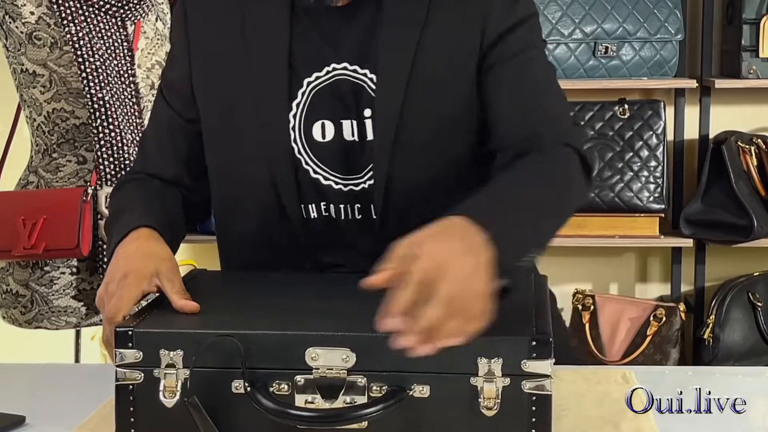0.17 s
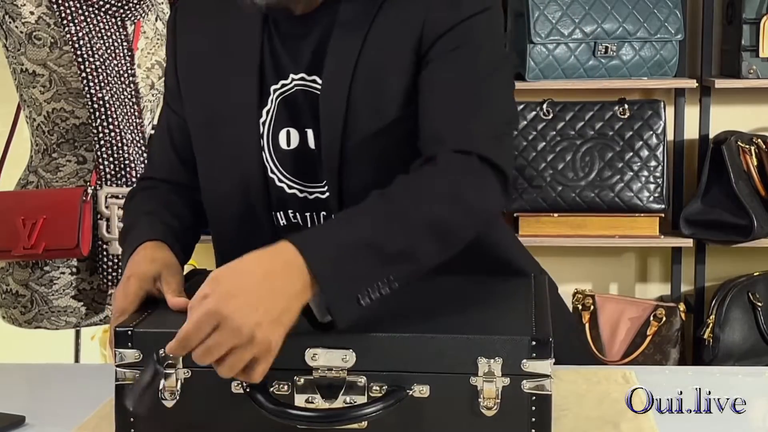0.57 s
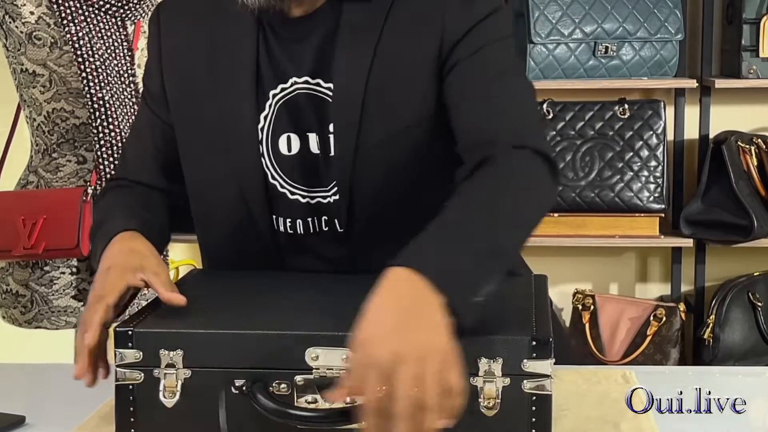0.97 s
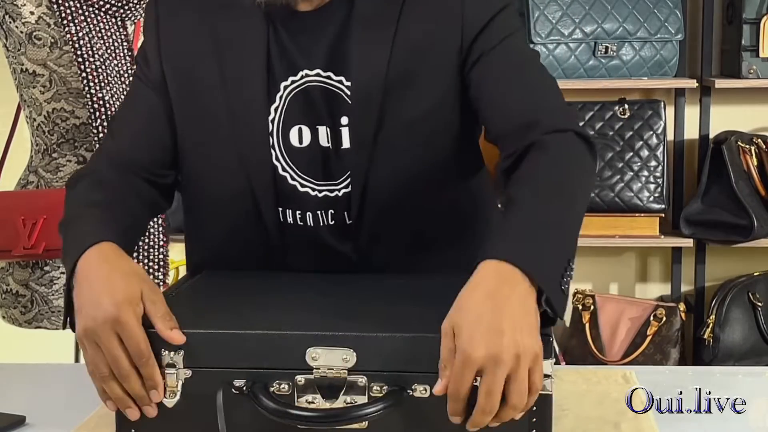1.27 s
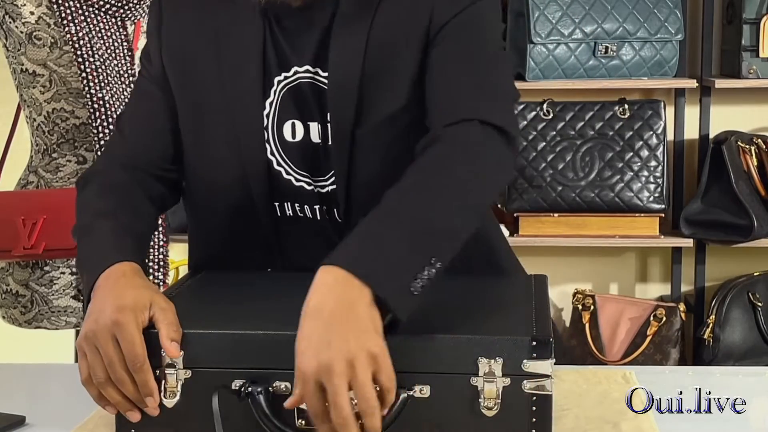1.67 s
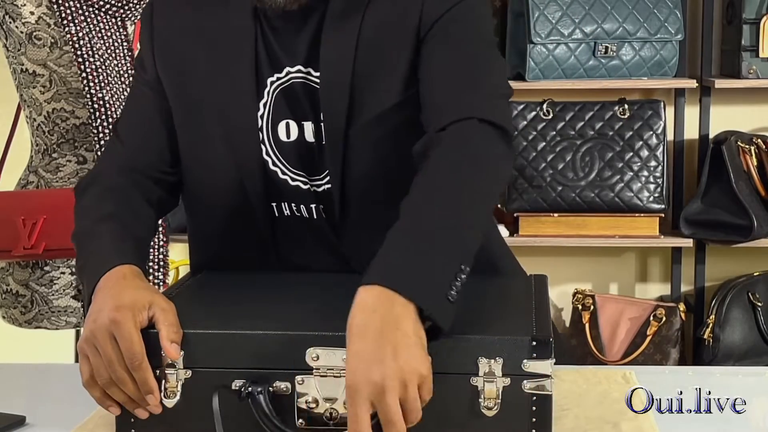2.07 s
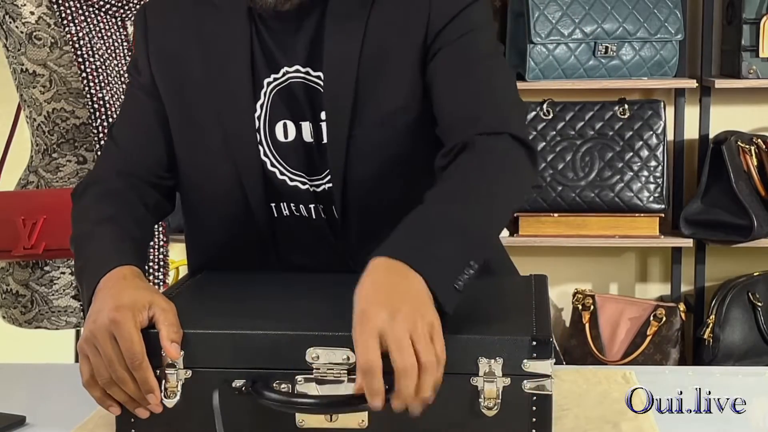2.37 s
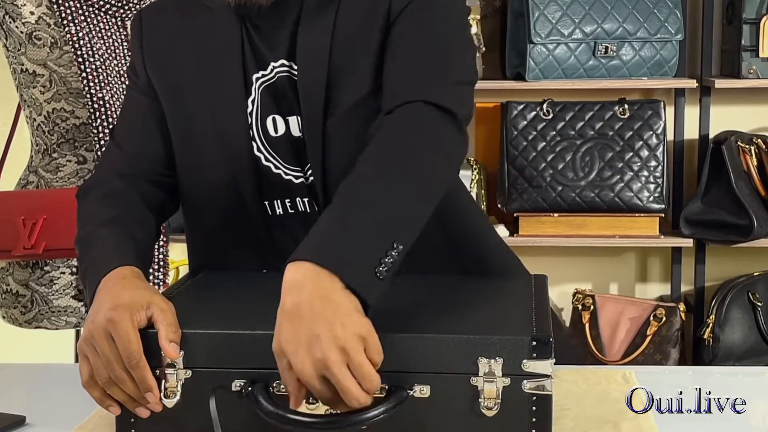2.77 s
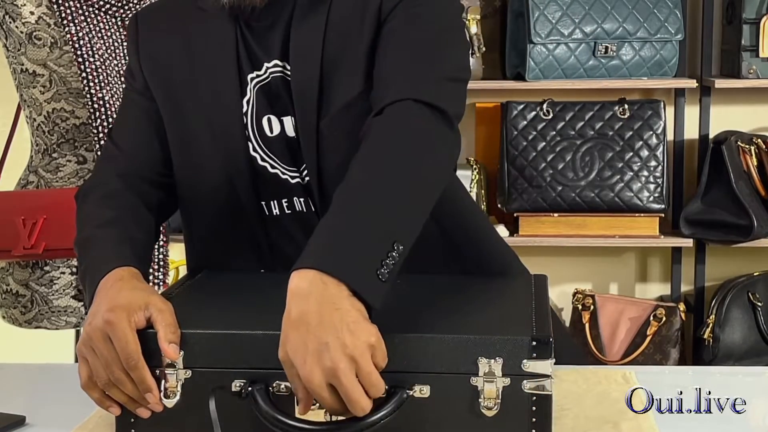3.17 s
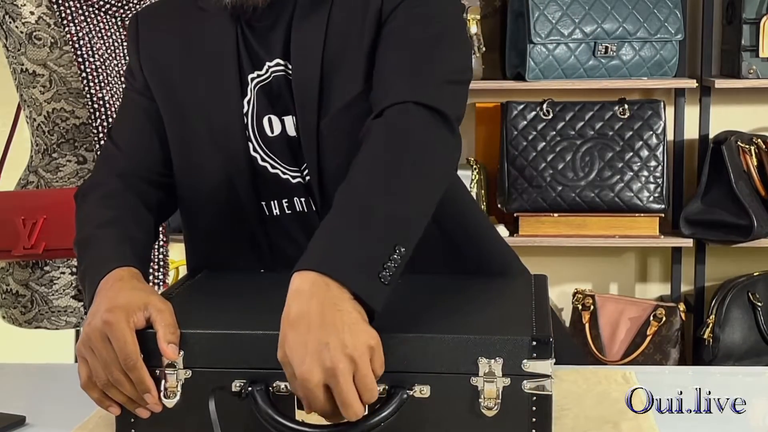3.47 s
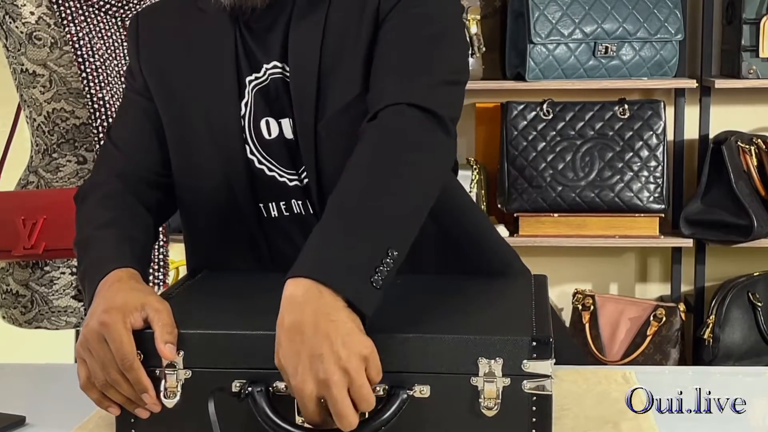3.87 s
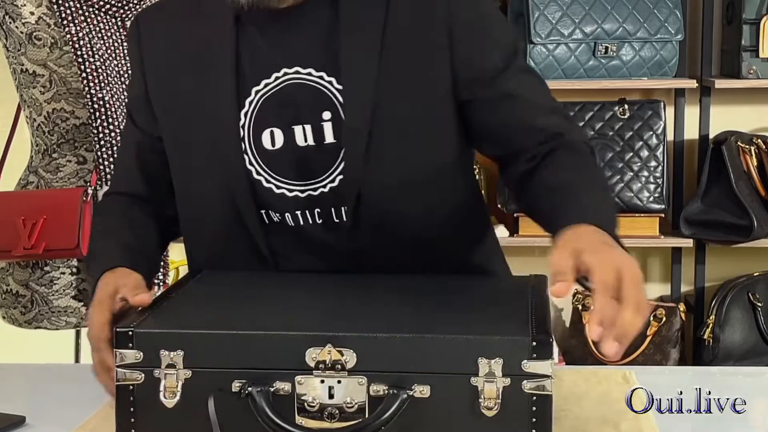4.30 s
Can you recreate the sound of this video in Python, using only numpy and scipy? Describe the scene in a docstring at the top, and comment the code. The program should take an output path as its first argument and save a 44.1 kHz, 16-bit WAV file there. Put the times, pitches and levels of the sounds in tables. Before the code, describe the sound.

A leather briefcase is unlatched near one microphone, with a short echo from the walls of a small room. First a side catch rattles open, then come soft finger bumps, tiny handle squeaks and muffled clicks inside the lock. The hasp flies open in a sharp, bouncing snap that knocks the hollow case, the loudest moment. Light taps and bumps close it out, with sleeves rustling faintly throughout.

```python
"""Briefcase latches in a small room

One microphone close to a leather briefcase on a table, with the walls answering and quiet air behind.
A side catch flips open, the handle squeaks on its pivots and the lock's works click under a hand.
Then the main hasp springs open and bounces, ringing its plate and steel and knocking the hollow case.
In between, sleeves rustle, nails graze the fittings and fingers bump the leather."""
import sys
import numpy as np
from scipy import signal
from scipy.fft import rfft, irfft, next_fast_len
from scipy.io import wavfile
from scipy.ndimage import uniform_filter1d

SR = 44100
rng = np.random.default_rng(int(sys.argv[2]) if len(sys.argv) > 2 else 0)


def unload_audio(sound):
    """Save the sound as a 16-bit wav file, at the path given as the first command line argument."""
    columns = np.transpose(np.atleast_2d(sound))
    # keep every value between -1 and 1, then stretch to whole-number steps
    steps = np.round(np.clip(columns, -1, 1) * 32767)
    wavfile.write(sys.argv[1], SR, steps.astype(np.int16))


N = 195627
T = np.arange(SR // 2) / SR  # the life of one sound [s]

# the room's quiet air (frequency [Hz], level [dB])
AIR_SPECTRUM = [(15, -51.5), (25, -13), (111, 4.5), (591, 1), (641, -2), (1160, -10), (1330, -10.5),
                (3820, -22.5), (6740, -28), (14400, -32), (16000, -57)]
# how long the room rings (frequency [Hz], t60 [s])
ROOM_DECAY = [(80, .45), (210, .45), (330, .29), (520, .28), (700, .3), (2500, .29), (7000, .27),
              (11000, .25), (16000, .2)]
# strength of the room's answer (frequency [Hz], level [dB])
WALL_TONE = [(60, -1), (220, -3), (480, -5), (1000, -3), (4000, -2), (9000, 0.5), (15000, -3)]
# rustle following the speed of the arms (time [s], level [dB])
ARM_MOVES = [(0.0, -73.5), (0.08, -68.5), (0.23, -66.5), (0.44, -75.5), (0.56, -73.5), (0.77, -76),
             (1.1, -72), (1.25, -80.5), (1.48, -73.5), (1.9, -72), (2.37, -76), (2.54, -69.5),
             (2.88, -76.5), (3.28, -104), (3.5, -72), (3.83, -79), (4.17, -65.5), (4.34, -74.5)]
# a fitting scrapes before it lets go (time [s], level [dB])
SCRAPES = [(3.559, -54), (3.876, -65.5), (4.022, -69.5), (4.405, -72.5)]
# cloth sliding over the case (frequency [Hz], level [dB])
SLEEVE_SPECTRUM = [(50, -19), (120, 1.5), (450, -9.5), (900, 2.5), (2000, -1.5), (3600, -1), (6000, -9),
                   (10000, -17.5), (16000, -32.5)]
# fingers and handle bumping the case (time [s], level [dB], pitch [Hz])
CASE_BUMPS = [(.511, -56.5, 264), (.524, -52, 170), (1.09, -53, 119), (1.135, -57.5, 124),
              (1.426, -52, 215), (1.86, -44, 493), (2.004, -54.5, 230), (2.426, -37.5, 172),
              (2.99, -52.5, 125), (3.393, -48, 135), (3.551, -29, 402), (3.967, -58.5, 220),
              (4.036, -53, 380), (4.35, -53.5, 340), (4.394, -46, 326), (4.409, -42, 168)]
# modes of the hollow case (frequency [Hz], level [dB], t60 [s])
CASE_MODES = [(215, -18.5, .045), (390, -3, 0.023), (483, 1, .026), (706.3, -15.5, 0.048)]
# skin dragging on leather (frequency [Hz], level [dB])
DRAG_SPECTRUM = [(40, -20.5), (110, 0), (300, -3), (700, -8.5), (2000, -22), (8000, -45)]
# a side catch flipping and rattling (time [s], relative level [dB], relative bright edge [dB])
CATCH_SLAPS = [(0.8025, -36, -2), (0.813, -32.5, -5), (0.817, -34, -13), (0.8311, -28, -21),
               (4.411, -42, -4)]
# its lever slapping the leather side (frequency [Hz], level [dB])
LEVER_SPECTRUM = [(50, -20), (150, -3), (420, 1), (900, 1.5), (1700, -2), (2700, -5.5), (3500, -12),
                  (4500, -21), (8000, -30), (16000, -44)]
# the bright edge of a metal contact (frequency [Hz], level [dB])
CRACK_SPECTRUM = [(100, -36.5), (3000, -16), (4700, 5.5), (7500, 1), (10000, -7), (12500, -19.5),
                  (16000, -27.5)]
# nails touching the fittings (time [s], relative level [dB], pitch [Hz])
NAIL_TICKS = [(1.125, -49.5, 5000), (1.332, -49.5, 2830), (1.862, -52, 1750), (1.941, -50.5, 1720),
              (2.328, -50, 2030), (2.333, -58.5, 9500), (2.434, -58.5, 11600), (2.681, -50.5, 3050),
              (3.486, -55.5, 9200)]
# clicks inside the lock as the fingers work it (time [s], relative level [dB])
LOCK_CLICKS = [(1.408, -50.5), (2.9221, -50), (2.9945, -43.5), (3.027, -57), (3.123, -44), (3.314, -48.5),
               (3.391, -43), (3.527, -44)]
# one click of the lock's works (frequency [Hz], level [dB])
CLICK_SPECTRUM = [(80, -14.5), (300, -5.5), (520, 4.5), (1000, 1.5), (2400, -1.5), (3300, -5.5),
                  (5200, -11.5), (7200, -13), (9500, -32.5), (16000, -41)]
# handle pivots squeaking (time [s], length [s], start pitch [Hz], end pitch [Hz], level [dB])
PIVOT_SQUEAKS = [(1.545, 0.023, 1211, 610, -56.5), (2.053, 0.013, 838, 1213, -51.5),
                 (2.069, 0.0165, 1270, 1050, -68), (2.77, 0.031, 437, 401, -61)]
# harmonics 1 to 7 of a squeak (level [dB])
SQUEAK_HARMONICS = [-0.5, -6, -4, -5, -8, -8.5, -14]
# leather crackling (frequency [Hz], level [dB])
CREASE_SPECTRUM = [(200, -5), (2000, -8), (6000, 1), (11000, -5), (16000, -3)]
# fingers tap the hasp against its plate (time [s], level [dB], room tail [dB])
HASP_TAPS = [(1.9999, -58, -12), (3.8776, -43, -4.5), (4.034, -59.5, -25)]
# modes of the lock plate (frequency [Hz], level [dB], t60 [s])
PLATE_MODES = [(870, -4, 0.032), (1057, -3, 0.037), (1243, -1.5, 0.011), (1538, -5.5, 0.045),
               (1760, -7.5, 0.014), (2310, -1, 0.018), (2704, -3, 0.019), (3290, -0.5, 0.01)]
# the hasp striking the plate (frequency [Hz], level [dB])
CLACK_SPECTRUM = [(50, -28), (250, -11), (800, 9.5), (2600, 5.5), (3500, -12), (4500, -26.5), (16000, -51)]
# modes of the steel hasp and spring (frequency [Hz], level [dB], t60 [s])
STEEL_MODES = [(4390, 5.5, 0.0052), (5200, -5, 0.025), (5400, -10, 0.0077), (6480, -9.5, 0.024),
               (7190, -6, 0.033), (8740, -7.5, 0.011), (10100, -12.5, 0.002)]
# the hasp's fuller tone where it is released (frequency [Hz], gain [dB])
HASP_RELEASE_TONE = [(40, -11.5), (160, 2), (500, -0.5), (850, -2.5), (1300, -1.5), (2050, 2), (3400, -0.5),
                     (7000, -3.5), (13000, 1)]
# its thinner tone where it meets its stop (frequency [Hz], gain [dB])
HASP_STOP_TONE = [(40, -13.5), (180, 1), (500, -0.5), (1000, -1), (1600, -5), (2400, 5), (3400, 4),
                  (4400, -2.5), (13000, -3)]


def amp(db):
    """Decibels to gain."""
    return 10 ** (np.asarray(db) / 20)


def unit(x):
    """x at rms 1."""
    return x / np.sqrt(np.mean(x ** 2) + 1e-20)


def blow(x):
    """x with the energy of 2 ms at rms 1."""
    return x * np.sqrt(.002 * SR / np.sum(x ** 2))


def along(points, hz):
    """(Hz, value) points read on a log axis."""
    freqs, values = np.transpose(points)
    return np.interp(np.log(hz + 1), np.log(freqs), values)


def fade(t60, t=T):
    """A decay of 60 dB in t60 seconds."""
    return np.exp(-np.log(1000) * t / np.maximum(t60, 1e-4))


def colour(x, points):
    """x through a causal filter with the given (Hz, dB) shape."""
    size = 2 * next_fast_len(len(x))
    cepstrum = irfft(np.log(amp(along(points, np.fft.rfftfreq(size, 1 / SR)))))
    cepstrum[1:size // 2] *= 2  # fold to minimum phase
    cepstrum[size // 2 + 1:] = 0
    return irfft(rfft(x, size) * np.exp(rfft(cepstrum)))[:len(x)]


def add(track, s, sound):
    """Mix a sound into the track at s seconds."""
    part = track[max(round(s * SR), 0):][:len(sound)]
    part += sound[:len(part)]


def ring(modes, scatter_db):
    """Damped modes, struck at new strengths each time; neighbours swing in opposite directions."""
    out = np.zeros(len(T))
    for k, (hz, db, t60) in enumerate(modes):
        strength = amp(db + scatter_db * rng.standard_normal())
        out += (-1) ** k * strength * fade(t60) * np.sin(2 * np.pi * hz * T)
    return blow(out)


def burst(spectrum, t60, chatter=0.99):
    """One sharp contact followed by the brief chatter of the two surfaces."""
    contact = rng.standard_normal(len(T)) * fade(t60)
    contact *= chatter / np.linalg.norm(contact)
    contact[0] = 1
    return blow(colour(contact, spectrum))


def all_round(x):
    """Summed over all directions, a source's narrow peaks and notches even out."""
    spectrum = rfft(x, 2 * len(x))
    power = np.abs(spectrum) ** 2
    bins = np.arange(len(power))
    low, high = bins * 7 // 8, np.minimum(bins * 9 // 8 + 1, len(bins) - 1)
    total = np.cumsum(power)
    smooth = np.abs(total[high] - total[low]) / (high - low)
    return irfft(spectrum * np.sqrt(smooth / (power + smooth / 20 + 1e-30)))[:len(x)]


def room(x, tail_db, wall_db):
    """At the microphone: the direct sound, a near wall's echo and a diffuse tail, new for each spot."""
    hz, t, noise = signal.stft(rng.standard_normal(len(T)), SR, nperseg=256)
    decay = fade(along(ROOM_DECAY, hz)[:, None], t)
    tail = signal.istft(noise * decay, SR, nperseg=256)[1][:len(T)]
    tail = colour(tail * (1 - np.exp(-T / 0.0049)), WALL_TONE)
    answer = amp(tail_db) * tail / np.linalg.norm(tail)
    wall = rng.standard_normal(len(T)) * fade(0.046)
    add(answer, .0125, amp(wall_db) * wall / np.linalg.norm(wall))  # about 4 m of extra path
    return x + signal.fftconvolve(all_round(x), answer)[:len(x)]


def room_air():
    """Room tone: a low, steady hush around the microphone."""
    return amp(-71) * unit(colour(rng.standard_normal(N), AIR_SPECTRUM))


def sliding(scrape_s=0.028):
    """Sleeves slide over the case and fittings scrape in short swells, both with small uneven snags."""
    t = np.arange(N) / SR
    arms = amp(np.interp(t, *np.transpose(ARM_MOVES)))
    scrapes = sum(amp(db) * np.exp(-((t - s) / scrape_s) ** 2) for s, db in SCRAPES)
    snag_db = 1.8 * unit(uniform_filter1d(rng.standard_normal(N), size=300))
    friction = unit(colour(rng.standard_normal(N), SLEEVE_SPECTRUM))
    return (arms + scrapes) * amp(snag_db) * friction


def bumps(nudge_count=8, cycles=2.7):
    """Soft contacts swing the leather panels a few cycles and knock the case; then skin drags on."""
    out = np.zeros(N)
    nudges = [(when * N / SR, -66 + 9.5 * size, 69.6 * 2 ** (2 * pitch))  # faint bumps at random
              for when, size, pitch in rng.random((nudge_count, 3))]
    for s, db, hz in CASE_BUMPS + nudges:
        push = np.sin(2 * np.pi * hz * T) * fade(cycles / hz) * (1 - np.exp(-T * hz)) ** 2
        spectrum = [(hz / 4, -22), (hz, 0), (hz * 2, -7), (hz * 6, -30), (16000, -62)]
        pat = amp(-6.5) * burst(spectrum, t60=0.045, chatter=1.4)
        knock = amp(-10.5) * ring(CASE_MODES, scatter_db=1.0)
        add(out, s, room(amp(db) * (blow(push) + pat + knock), tail_db=-10, wall_db=-13.5))
    for s, _, _ in CASE_BUMPS:
        drag = unit(colour(rng.standard_normal(len(T)), DRAG_SPECTRUM))
        add(out, s, amp(-64) * drag * fade(0.45))
    return out


def side_catch(settle_s=0.0055):
    """A loose lever slaps the leather side and touches once more: a dull rattle, and the lid hums."""
    out = np.zeros(N)
    lid = amp(-17.5) * np.sin(2 * np.pi * 220 * T) * fade(0.24)
    for s, db, edge_db in CATCH_SLAPS:
        slap = burst(LEVER_SPECTRUM, t60=0.025, chatter=1.83)
        slap += amp(edge_db - 14.5) * burst(CRACK_SPECTRUM, t60=0.016)
        add(slap, settle_s, amp(-8) * burst(LEVER_SPECTRUM, t60=0.011))
        add(out, s, amp(db - 3.5) * (room(slap, tail_db=-6.5, wall_db=-3.5) + lid))
    return out


def nail_ticks():
    """Nails graze the metal: short narrow chirrs, close and nearly dry."""
    out = np.zeros(N)
    for s, db, hz in NAIL_TICKS:
        spectrum = [(hz / 8, -24), (hz / 2, -13), (hz, 0), (hz * 1.4, -15), (hz * 4, -28), (hz * 9, -44)]
        graze = burst(spectrum, t60=0.036, chatter=5.5)
        add(out, s, room(amp(db - 9) * graze, tail_db=-15.5, wall_db=-16))
    return out


def lock_clicks():
    """The lock's works click under the covering hand, so the microphone hears them mostly off the walls."""
    out = np.zeros(N)
    for s, db in LOCK_CLICKS:
        click = amp(db - 6) * burst(CLICK_SPECTRUM, t60=.012, chatter=0.47)
        add(out, s, room(click, tail_db=2.5, wall_db=-2))
    return out


def handle_squeaks():
    """A pivot sticks and slips at an uneven, gliding rate, and the room smears the short tone."""
    out = np.zeros(N)
    for s, length, start_hz, end_hz, db in PIVOT_SQUEAKS:
        progress = np.clip(T / length, 0, 1)
        glide_hz = start_hz + (end_hz - start_hz) * progress
        jitter = .022 * unit(uniform_filter1d(rng.standard_normal(len(T)), size=60))
        phase = 2 * np.pi * np.cumsum(glide_hz * (1 + jitter)) / SR
        slips = unit(sum(amp(level) * np.sin(k * phase) for k, level in enumerate(SQUEAK_HARMONICS, 1)))
        swell = np.sqrt(4 * progress * (1 - progress))
        add(out, s, room(amp(db) * slips * swell, tail_db=-0.5, wall_db=0.5))
    return out


def creases(start_s=1.68, span_s=.3):
    """Leather and fittings crackle faintly while the handle is lifted and turned."""
    out = np.zeros(N)
    for when, size in rng.random((28, 2)):
        crackle = burst(CREASE_SPECTRUM, t60=.012, chatter=1.5)
        add(out, start_s + span_s * when, amp(-76 + 12 * size ** 3) * crackle)
    return out


def hasp(tone, clack_db, knock_db, steel_db, tail_db):
    """Each contact of the hasp clacks the plate, rings the steel and knocks the case behind them."""
    clack = ring(PLATE_MODES, scatter_db=3.5) + amp(-4) * burst(CLACK_SPECTRUM, t60=0.026, chatter=2.1)
    steel = amp(-2.5) * ring(STEEL_MODES, scatter_db=8) + burst(CRACK_SPECTRUM, t60=0.007, chatter=6.1)
    knock = ring(CASE_MODES, scatter_db=0.5)
    hit = amp(clack_db) * clack + amp(steel_db) * steel + amp(knock_db) * knock
    return room(colour(hit, tone), tail_db, wall_db=tail_db - 0.5)


def hasp_taps():
    """Moved by a finger, the hasp clicks once and does not bounce."""
    out = np.zeros(N)
    for s, db, tail_db in HASP_TAPS:
        tap = hasp(HASP_RELEASE_TONE, clack_db=0, knock_db=-0.5, steel_db=0.5, tail_db=tail_db)
        add(out, s, amp(db) * tap)
    return out


def hasp_snap(s=3.5705, bounces=3, flight_s=.0378, shorten_s=.0117):
    """The hasp flies open and bounces ever faster; the metal loses more each time than the case does."""
    out = np.zeros(N)
    levels_db, loss_db = np.array([0, 3.5, -5]), np.array([7.8, 4.5, 6])  # plate, case, steel
    add(out, s, hasp(HASP_RELEASE_TONE, *levels_db, tail_db=-10))
    for k in range(bounces):
        s += flight_s - shorten_s * k
        levels_db -= loss_db
        add(out, s, hasp(HASP_STOP_TONE, *levels_db, tail_db=-14))
    return amp(-8) * out


def scene():
    """All the handling over the room's quiet air, in mono."""
    air = room_air()
    latches = hasp_snap() + hasp_taps() + side_catch() + lock_clicks()
    handling = bumps() + nail_ticks() + handle_squeaks() + sliding() + creases()
    return (air + latches + handling)[None]


def record(dry, ceiling=.92, bottom_hz=50, top_hz=15900):
    """The recorder rounds off peaks near full scale and sheds the deepest bass and highest treble."""
    rounded = dry / (1 + np.abs(dry / ceiling) ** 6) ** (1 / 6)
    lean = signal.sosfilt(signal.butter(2, bottom_hz, "highpass", fs=SR, output="sos"), rounded)
    return signal.sosfilt(signal.ellip(12, .1, 90, top_hz, fs=SR, output="sos"), lean)


dry = scene()
out = record(dry)
unload_audio(out)
```